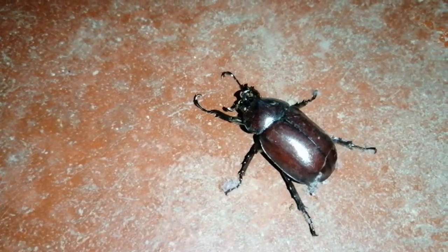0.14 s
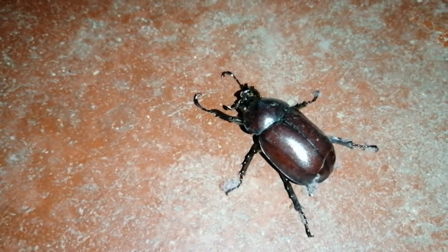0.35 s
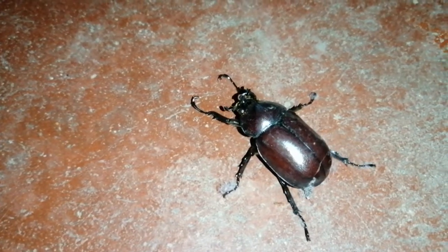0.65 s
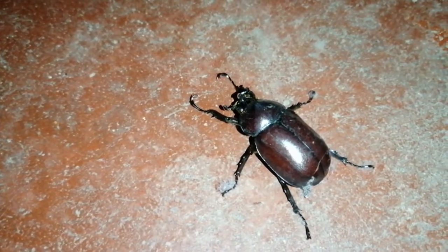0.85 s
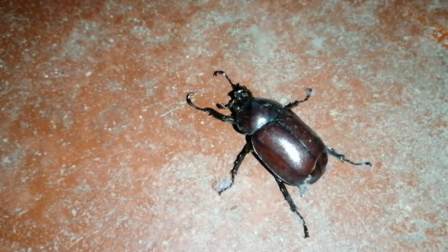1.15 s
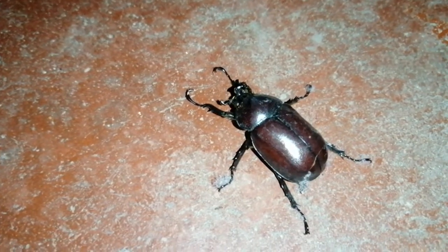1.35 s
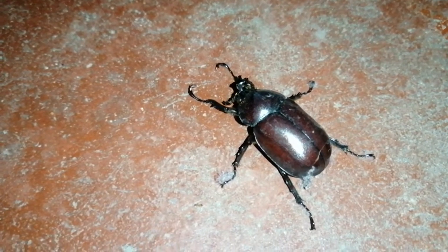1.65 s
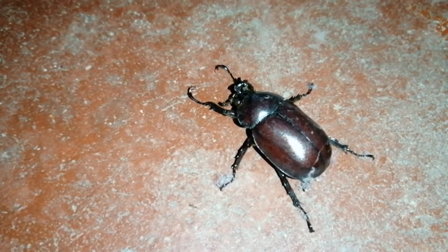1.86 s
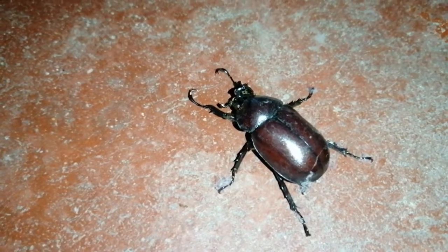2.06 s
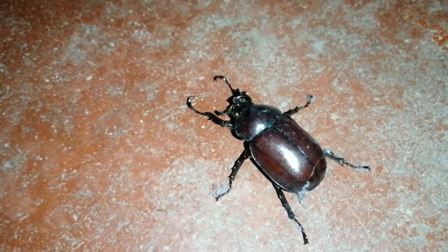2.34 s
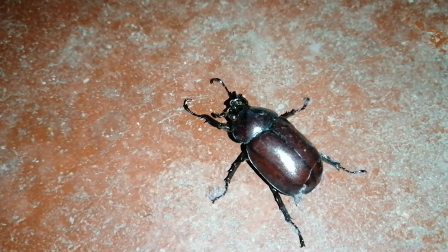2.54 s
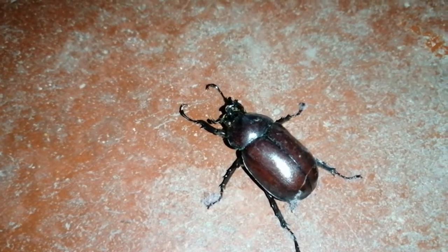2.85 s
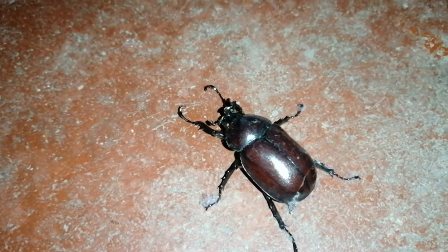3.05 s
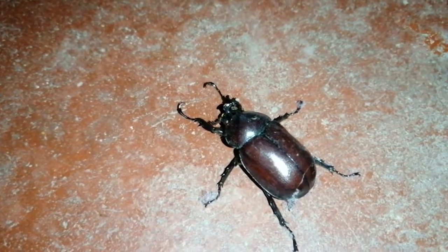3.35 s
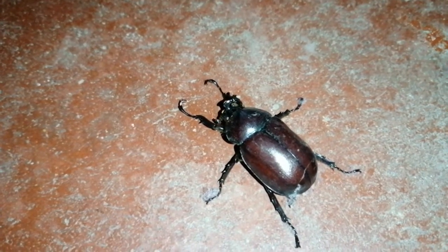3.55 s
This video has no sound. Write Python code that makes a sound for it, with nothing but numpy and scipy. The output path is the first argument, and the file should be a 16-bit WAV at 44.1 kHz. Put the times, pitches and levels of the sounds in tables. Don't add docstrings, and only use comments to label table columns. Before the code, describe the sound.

Two scratchy beetle hisses of about a second and a half, separated by a short quiet gap with a soft tap. Tiled floor, very short reflections, close small stereo microphone, faint light wind and distant insect chorus.

```python
import sys
import numpy as np
from scipy import signal
from scipy.fft import rfft, irfft, next_fast_len
from scipy.io import wavfile
from scipy.ndimage import map_coordinates

SR = 44100
rng = np.random.default_rng(int(sys.argv[2]) if len(sys.argv) > 2 else 0)


def rack_gain(trim_db):
    fader = np.asarray(trim_db, float)
    return 10 ** (fader / 20)


def master_out(mix):
    frames = np.transpose(np.atleast_2d(mix))
    ceiling = np.clip(frames, -1, 1)
    pcm = np.round(ceiling * 32767).astype(np.int16)
    wavfile.write(sys.argv[1], SR, pcm)


N = 163170
T = np.arange(N) / SR

# (time [s], slip rate [1/s], level [dB], deep slip level [dB], shell level [dB])
STROKES = [
    [(.223, 1500, -46, -25, 0), (.24, 1838, -36, -19.5, -0.5), (.35, 898, -38.5, 6, 1.5),
     (.42, 412.7, -41, 5, 0.5), (.75, 197.1, -45.5, 1, -4.5), (.86, 270.8, -46.5, -7.5, -7.5),
     (.905, 1100, -38, -10, -6.5), (1.0, 332.3, -47.5, 11.5, 2.5), (1.625, 188.3, -52, 0.5, -3)],
    [(2.026, 1573, -43.5, -29, -8.5), (2.04, 1700, -36.5, -11.5, -4), (2.15, 801, -39, 0, 0.5),
     (2.24, 400, -42.5, 6.5, 1), (2.645, 158.6, -48, -0.5, -4.5), (2.69, 1194, -40, -5.5, -5),
     (2.755, 1200, -39.5, -5, -6.5), (2.81, 336.4, -47, 9.5, 2.5), (3.45, 188, -52, 5.5, -1)],
]
# (time [s], length [s])
STALLS = [(0.734, 0.01218), (0.843, 0.00591), (1.127, 0.0058), (1.136, 0.00764), (1.287, 0.0065),
          (1.593, 0.00706), (1.611, 0.00631), (2.538, 0.00625), (2.618, 0.004876), (2.898, 0.00592),
          (2.906, 0.00934), (2.93, .006), (2.95, .006), (2.966, .011), (3, .007), (3.01, .007),
          (3.294, .008)]
# (time [s], level [dB])
LAST_SLIPS = [
    (1.6365, 3),
    (3.4555, 5.5),
    (3.474, 4.5),
]
# (frequency [Hz], width [Hz], level [dB])
RIGHT_PORT = [(3834, 438, -17), (4487, 871, -13), (4973, 758, -12), (6504, 550, -10.5), (6897.3, 668, -1),
              (8170, 771, -11), (9016, 633, -20.5), (9880, 1240, -21.5), (12853, 1770, -25),
              (14830, 1274, -21.5), (15700, 390, -34)]
# (frequency [Hz], width [Hz], level [dB])
LEFT_PORT = [(5000, 1430, -24.5), (6520, 1200, -22.5), (8010, 2320, -22), (9245, 1000, -26),
             (10700, 1276, -21.5), (12900, 990, -25), (14520, 1210, -25.5)]
# (frequency [Hz], width [Hz], level [dB])
SHELL_MODES = [(2140.4, 900, -29), (2794, 978, -32)]
# (frequency [Hz], width [Hz], level [dB])
SHELL_LIFT = [(3470, 398, 15), (2564, 415, 4.92)]
# (frequency [Hz], width [Hz], level [dB])
BODY_MODES = [
    [(901, 437, -30.5)],
    [(717, 385, -35), (1037, 370, -26)],
]
# (frequency [Hz], width [Hz], left level [dB], right level [dB])
CHORUS = [(5075, 500, -81, -74), (6561.5, 460, -71.5, -61), (8580, 1400, -84, -83), (9465, 520, -81, -81.5),
          (14800, 1100, -90.5, -89.5)]
# (time [s], level [dB])
RUMBLE_LEVEL = [(0.0, -70.5), (0.21, -69.5), (0.33, -77.5), (0.43, -75.5), (1.71, -74.5), (1.75, -69.5),
                (1.99, -66.5), (2.09, -76.5), (3.7, -71)]
# (frequency [Hz], level [dB])
RUMBLE_SPECTRUM = [(12, -37.5), (20, -2.5), (65, -5), (117, -7.5), (291, -18.5), (468, -25), (700, -30.5),
                   (910, -49), (1540, -120)]
# (frequency [Hz], level [dB])
HISS_SPECTRUM = [(150, -13.5), (500, -5), (1200, -4.5), (3000, -7), (4000, -6), (10000, -19),
                 (15000, -13.5)]

TOP_HZ = 15830
WIND_ALIKE = 0.5
HISS_DB = -74.5
TAP_S, TAP_HZ, TAP_DB, TAP_WIDE_S = 1.8613, 560, -57, 0.0012
MOAN_S, MOAN_LONG_S, MOAN_HZ, MOAN_DB = 1.7, 0.0948, 491.5, -74.5
CHORUS_DRIFT_DB, CHORUS_FLUTTER_DB = 1.1, 1.5
TILE_DB, TILE_T60_S = -12, 0.0437
PACE_DB, SWAY_DB = 1.6, 0.9
JITTER, SIZE_DB = 0.14, 1.8
LAST_DB = -56.5
DEEP_SHARE, DEEP_IN_SHELL = 0.34, 0.319
SCRAPE_S, SCRAPE = 0.0006, 0.24
OWN_GRIT = 0.758
RASP_FROM_HZ = 3700
RIGHT_LAG_S, SHELL_LAG_S = 0.00002, 0.0005
EDGE_DB, EDGE_S, TOP_DB_PER_S = 2.5, 0.05, 8
NOTCH_HZ, NOTCH_WIDE_HZ, NOTCH_DB = 4170, 230, -30


def unit(x):
    return x / np.sqrt(np.mean(x ** 2) + 1e-20)


def wobble(rate):
    knots = rng.standard_normal(int(N * rate / SR) + 4)
    return map_coordinates(knots, [np.arange(N) * rate / SR])


def filtered(x, response):
    m = 2 * next_fast_len(N // 2 + 4096)
    return irfft(rfft(x, m) * response(np.fft.rfftfreq(m, 1 / SR)), m)[..., :N]


def along(points):
    f, db = np.transpose(points)
    return lambda hz: rack_gain(np.interp(np.log(hz + 1), np.log(f), db, left=-120, right=-120))


def humps(peaks, hz):
    power = 0
    for center, width, db in peaks:
        detuning = (hz * hz - center * center) / (hz * width + 1)
        power = power + (rack_gain(db) / (1 + detuning ** 2)) ** 2
    return np.sqrt(power)


def causal(gain, lag_s=0):
    def response(hz):
        cepstrum = irfft(np.log(gain(hz) + 1e-6))
        cepstrum[1:len(hz) - 1] *= 2
        cepstrum[len(hz):] = 0
        return np.exp(rfft(cepstrum) - 2j * np.pi * hz * lag_s)
    return response


def hiss():
    spectrum = along(HISS_SPECTRUM + [(TOP_HZ, -18)])
    return rack_gain(HISS_DB) * unit(filtered(rng.standard_normal((2, N)), spectrum))


def wind():
    a, b = filtered(rng.standard_normal((2, N)), along(RUMBLE_SPECTRUM))
    angle = np.arccos(np.clip(WIND_ALIKE, 0, 1)) / 2
    left = np.cos(angle) * a + np.sin(angle) * b
    right = np.cos(angle) * a - np.sin(angle) * b
    rumble = unit(np.array([left, right])) * rack_gain([[0], [2.4]])
    s, db = np.transpose(RUMBLE_LEVEL)
    return rumble * rack_gain(np.interp(T, s, db))


def moan():
    tone = unit(filtered(rng.standard_normal(N), lambda hz: humps([(MOAN_HZ, 150, 0)], hz)))
    return rack_gain(MOAN_DB) * tone * np.exp(-((T - MOAN_S) / MOAN_LONG_S) ** 2)


def tap():
    since = T - TAP_S
    return rack_gain(TAP_DB) * np.cos(2 * np.pi * TAP_HZ * since) * np.exp(-(since / TAP_WIDE_S) ** 2)


def insects():
    out = np.zeros((2, N))
    for center, width, *db in CHORUS:
        band = filtered(rng.standard_normal((2, N)), lambda hz: humps([(center, width, 0)], hz))
        sway_db = CHORUS_DRIFT_DB * wobble(5.4918) + CHORUS_FLUTTER_DB * wobble(60)
        out += rack_gain(np.array(db)[:, None] + sway_db) * unit(band)
    return out


def tiles(x):
    t = np.arange(SR // 10) / SR
    tail = rng.standard_normal((2, len(t))) * rack_gain(-60 * t / TILE_T60_S) * (t > 0.0015)
    return signal.fftconvolve(x, tail / np.linalg.norm(tail[0]), axes=1)[:, :N]


def slips():
    rows = np.concatenate(STROKES)
    moving = sum((T >= stroke[0][0]) & (T < stroke[-1][0]) for stroke in STROKES)
    for start, length in STALLS:
        moving = moving * ((T < start) | (T > start + length))
    pace = np.exp(np.interp(T, rows[:, 0], np.log(rows[:, 1])))
    count = np.cumsum(moving * pace * rack_gain(PACE_DB * wobble(40))) / SR
    luck = rng.standard_normal((5000, 3))[:int(count[-1])]
    jitter = np.clip(JITTER * luck[:, 0], -0.5, 0.5)
    at = np.searchsorted(count, np.arange(len(luck)) + 0.5 + jitter)

    level, deep, shell = (np.interp(at / SR, rows[:, 0], rows[:, k]) for k in (2, 3, 4))
    size_db = level - 10 * np.log10(pace[at] / SR) + SIZE_DB * luck[:, 1] + SWAY_DB * wobble(12)[at]
    deep = np.where(luck[:, 2] > 1.3 - 2 * DEEP_SHARE, deep, deep - 9)

    last_s, last_db = np.transpose(LAST_SLIPS)
    last_at = np.round(last_s * SR).astype(int)
    quiet = np.full(len(LAST_SLIPS), -6)
    return (np.r_[at, last_at], np.r_[size_db, last_db + LAST_DB + 24],
            np.r_[deep, quiet], np.r_[shell, quiet])


def beetle():
    at, size_db, deep_db, shell_db = slips()
    puff = np.exp(-np.abs(np.arange(-130, 131) / SR) / SCRAPE_S)
    grit = rng.standard_normal((3, N))

    def train(db):
        return np.bincount(at, rack_gain(db), N)

    def excite(db, own):
        spread = np.sqrt(np.abs(signal.fftconvolve(train(db) ** 2, puff ** 2, "same")))
        return train(db) + SCRAPE * spread * (grit[0] + own * grit[1:])

    rasp = excite(size_db, OWN_GRIT)
    deep = train(size_db + deep_db)
    shell = excite(size_db + shell_db, 0) + DEEP_IN_SHELL * deep
    steep = lambda hz: 1 / (1 + (RASP_FROM_HZ / (hz + 1)) ** 14)
    high, low = np.zeros((2, N)), np.zeros((2, N))
    for c, port in enumerate((LEFT_PORT, RIGHT_PORT)):
        high[c] = filtered(rasp[c], causal(lambda hz: humps(port, hz) * steep(hz), c * RIGHT_LAG_S))
        ring = causal(lambda hz: humps(SHELL_MODES, hz), c * SHELL_LAG_S)
        low[c] = filtered(shell[c], lambda hz: ring(hz) * humps([(hz, 1, 0), SHELL_LIFT[c]], hz))
        low[c] += filtered(deep, causal(lambda hz: humps(BODY_MODES[c], hz)))

    first_s, second_s = STROKES[0][0][0], STROKES[1][0][0]
    age = np.abs(T - np.where(T < second_s, first_s, second_s))
    edge_db, top_db = EDGE_DB * np.exp(-age / EDGE_S), TOP_DB_PER_S * (age - 0.5)
    for band, db in (((8100, 1800, 0), edge_db), ((14800, 3000, 0), top_db)):
        high = high + (rack_gain(db) - 1) * filtered(high, lambda hz: humps([band], hz))
    return rack_gain(15) * (high + rack_gain(TILE_DB) * tiles(high) + low)


def scene():
    return hiss() + wind() + moan() + tap() + insects() + beetle()


def low_pass(x):
    return signal.sosfilt(signal.butter(12, 16360, fs=SR, output="sos"), x)


def record(dry):
    notch = lambda hz: 1 - (1 - rack_gain(NOTCH_DB)) / (1 + ((hz - NOTCH_HZ) / NOTCH_WIDE_HZ) ** 2)
    ports = np.array([filtered(dry[0], causal(notch)), dry[1]])
    mix = filtered(ports, lambda hz: hz < TOP_HZ)
    return low_pass(mix)


dry = scene()
out = record(dry)
master_out(out)
```